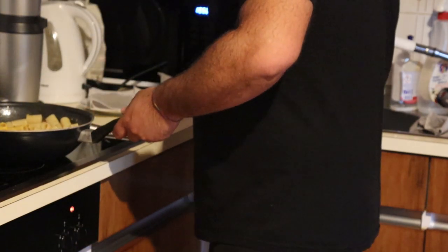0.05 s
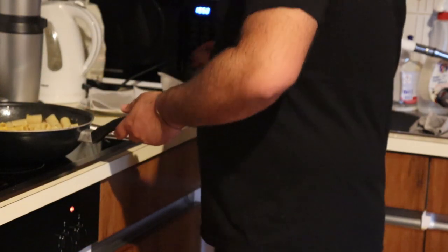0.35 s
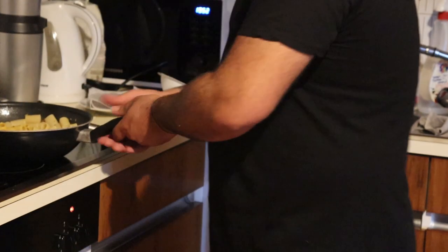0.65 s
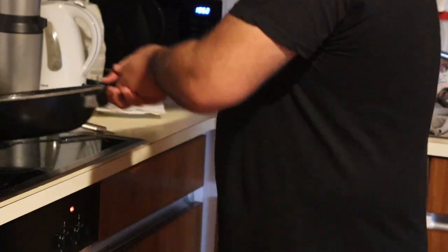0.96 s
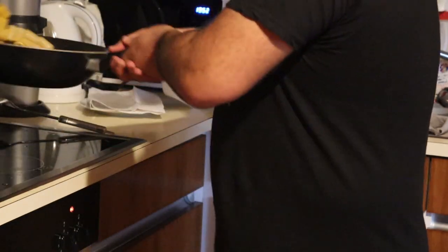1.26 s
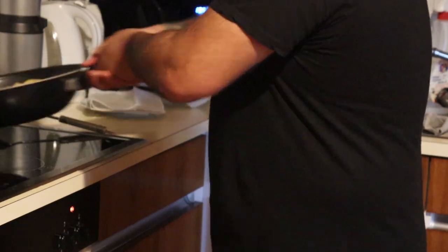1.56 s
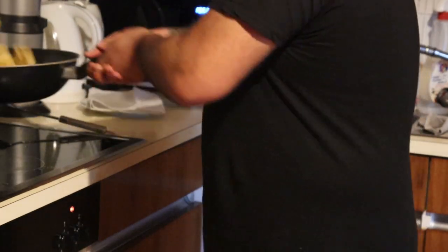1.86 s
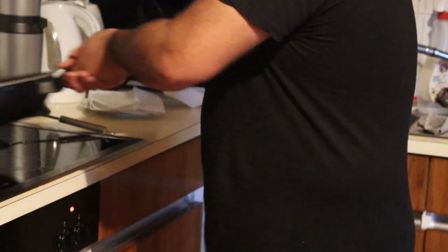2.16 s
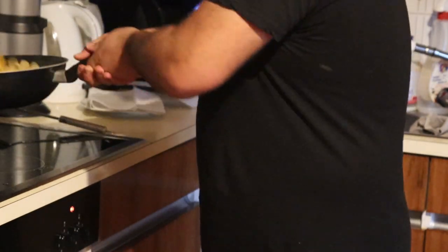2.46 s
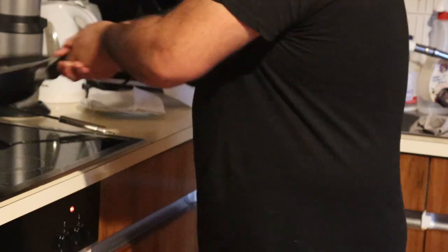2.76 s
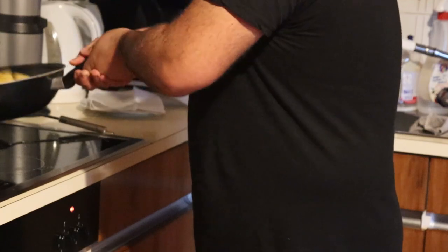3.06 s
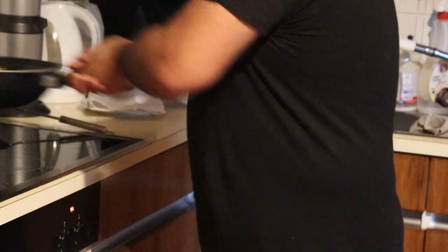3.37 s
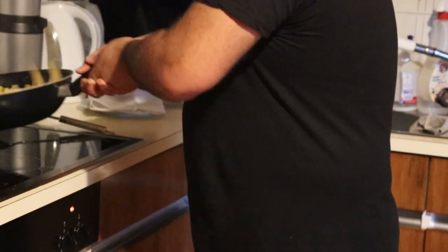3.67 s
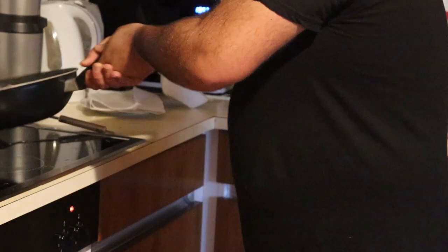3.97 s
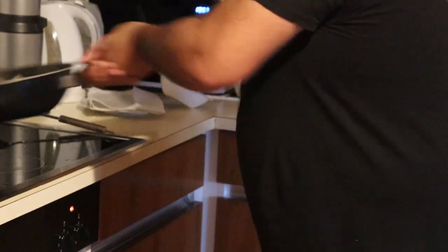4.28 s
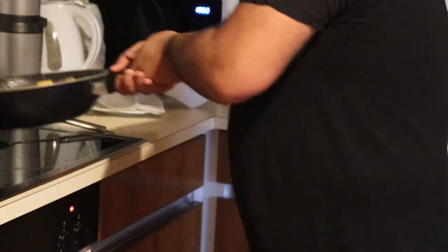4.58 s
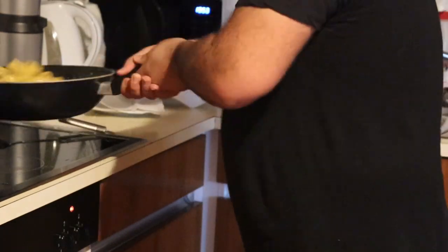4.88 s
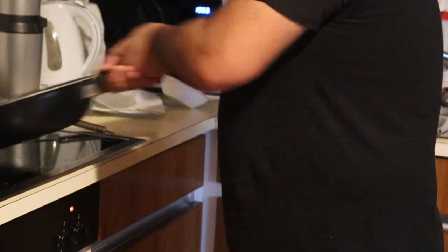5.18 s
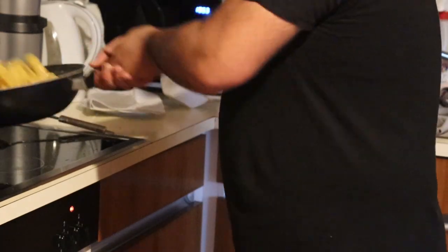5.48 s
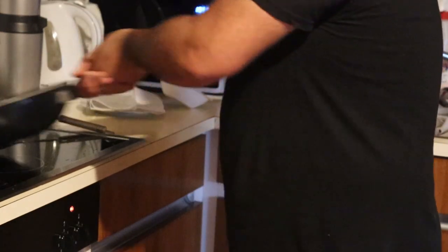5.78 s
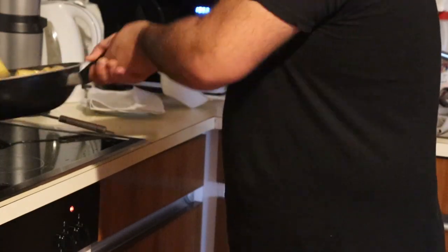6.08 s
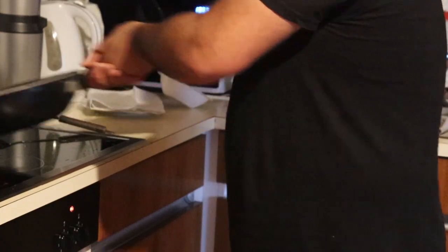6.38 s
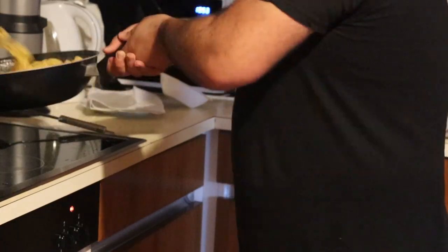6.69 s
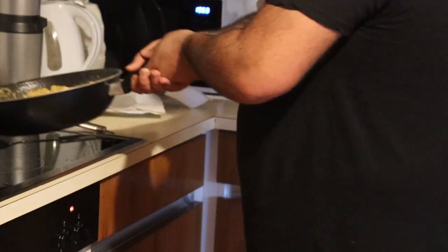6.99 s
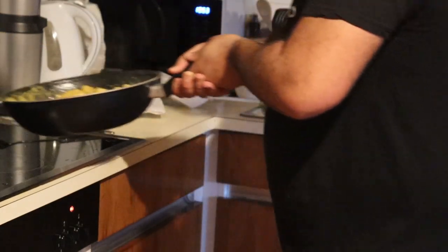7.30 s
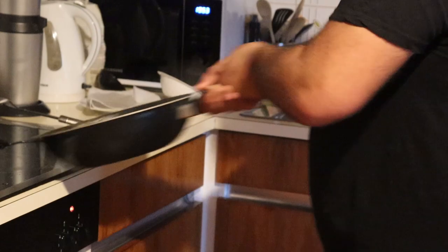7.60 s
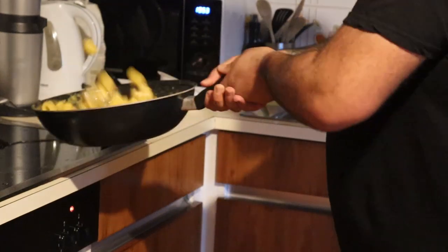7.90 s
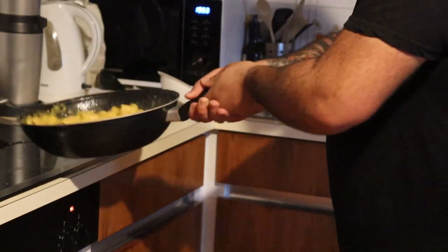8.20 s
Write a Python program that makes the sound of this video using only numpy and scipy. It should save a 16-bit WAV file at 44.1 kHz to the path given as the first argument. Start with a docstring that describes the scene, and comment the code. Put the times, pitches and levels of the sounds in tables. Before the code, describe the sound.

A pan clunks down, then pasta squelches and slaps as it is tossed in a small kitchen, with one ringing metal bang.

```python
"""First comes a dull clunk as a frying pan is set down in a small, echoing kitchen.
Then pasta in a creamy sauce is tossed in it: it slides with a sticky crackle and lands in wet slaps,
while air pockets plop and strands of sauce snap. The pan clacks and chinks lightly, and near
six seconds it bangs on the hob and rings. An appliance hums underneath."""
import sys
import numpy as np
from scipy import signal
from scipy.fft import rfft, irfft, next_fast_len
from scipy.io import wavfile

SR = 44100
rng = np.random.default_rng(int(sys.argv[2]) if len(sys.argv) > 2 else 0)


def master(y):
    """Save y as 16-bit WAV."""
    cut = np.clip(np.atleast_2d(y).T, -1, 1)
    pcm = np.round(cut * 32767)  # scale
    wavfile.write(sys.argv[1], SR, pcm.astype(np.int16))


N = 363825
TIME = np.arange(N) / SR


def from_db(db):
    """Turn decibels into a number to multiply a sound by."""
    return 10 ** (np.asarray(db) / 20)


def rms_one(x):
    """Scale a sound so that its average strength (rms) is 1."""
    return x / np.sqrt(np.mean(x ** 2) + 1e-20)


def at_hz(points, hz):
    """Look up a frequency in a table, blending between rows on a musical (log) scale."""
    freqs, values = np.transpose(points)
    return np.interp(np.log(np.maximum(hz, 1)), np.log(freqs), values)


def add(out, start, sound):
    """Mix a sound in at a start time in seconds."""
    i = max(round(start * SR), 0)
    out[..., i:i + sound.shape[-1]] += sound[..., :N - i]


def fade(t, t60):
    """Die away smoothly; the fade time t60 is the seconds it takes to drop by 60 dB."""
    return np.exp(-np.log(1000) * t / max(t60, 1e-3))


def coloured(x, colour):
    """Give a sound a colour, a table of how strong each frequency is; rms 1."""
    size = next_fast_len(x.shape[-1] + 2048, real=True)
    gains = from_db(at_hz(colour, np.fft.rfftfreq(size, 1 / SR)))
    cepstrum = irfft(np.log(gains), size)
    cepstrum[1:] *= 2 * (np.arange(1, size) < size / 2)   # minimum phase: no ringing before a hit
    filtered = irfft(rfft(x, size) * np.exp(rfft(cepstrum)), size)
    return rms_one(filtered[..., :x.shape[-1]])


def resonance(x, hz, q):
    """Keep the sound near one pitch; a higher q rings longer."""
    return signal.lfilter(*signal.iirpeak(np.clip(hz, 50, .4 * SR), max(q, 1), fs=SR), x + 1e-18)


def burst(noise, colour, t60):
    """A coloured puff of noise that starts at an rms of about 1 and dies away."""
    shape = fade(TIME[:noise.shape[-1]], t60)
    return coloured(noise * shape, colour) * np.sqrt(np.mean(shape ** 2))


def dying(x, t60s):
    """Let each octave of a noise die at its own rate."""
    size = x.shape[-1]
    octave = np.log2(np.clip(np.fft.rfftfreq(size, 1 / SR), 2 ** 5, 2 ** 14))
    spectrum, out = rfft(x), 0
    for k in range(5, 15):
        band = irfft(spectrum * np.maximum(1 - abs(octave - k), 0), size)
        out = out + band * fade(TIME[:size], at_hz(t60s, 2 ** k))
    return out


# how alike the room sounds on the left and right: (frequency [Hz], likeness [1 = the same])
LIKENESS = [(60, 0.7), (200, 0.86), (400, 0.83), (700, 0.66), (1300, 0.29), (2400, 0.11), (16000, -0.12)]
# which side is louder: (frequency [Hz], left minus right [dB])
BALANCE_DB = [(100, -0.5), (1200, -0.6), (2400, -3.5), (4400, -2), (8000, -1.7), (14000, -1.5)]
def diffuse(size):
    """Stereo hiss arriving from all sides: alike in the bass, unrelated in the treble."""
    padded = next_fast_len(size)
    hz = np.fft.rfftfreq(padded, 1 / SR)
    mid, side = rfft(rng.standard_normal((2, padded)))
    alike = np.clip(at_hz(LIKENESS, hz), -1, 1)
    sides = np.array([[1], [-1]])
    field = np.sqrt(1 + alike) * mid + sides * np.sqrt(1 - alike) * side
    balance = from_db(sides * at_hz(BALANCE_DB, hz) / 2)
    return rms_one(irfft(field * balance, padded)[:, :size])


# the tones of the appliance: (pitch [Hz], rms level [dB])
HUM_TONES = [(49, -73.5), (98.5, -65), (197, -68.5), (270, -70)]
# the colour of the room's steady noise: (frequency [Hz], level [dB])
AIR_COLOUR = [(30, -27), (50, -13), (75, -16.5), (100, -8.5), (150, -6.5), (260, -3), (400, -6),
              (550, -9.5), (680, -7), (820, -12), (1700, -10), (4500, -16), (8000, -23), (15500, -24)]
def background(air_db=-54.0, waver_cycles=0.21):
    """An appliance hums, wavering slightly, over steady room noise."""
    knots = np.linspace(0, TIME[-1], 30)
    hum = 0
    for hz, level_db in HUM_TONES:
        wander = waver_cycles * np.interp(TIME, knots, rng.standard_normal(len(knots)))
        hum = hum + np.sqrt(2) * from_db(level_db) * np.sin(2 * np.pi * (hz * TIME + wander))
    return hum + from_db(air_db) * coloured(diffuse(N), AIR_COLOUR)


# how long the kitchen echoes: (frequency [Hz], fade time [s])
KITCHEN_T60 = [(100, 0.68), (500, 0.54), (1500, 0.55), (4000, 0.52), (8000, 0.49), (16000, 0.33)]
def kitchen(x, direct_db=-6.0, early_db=-1.5, early_t60=0.15, places=5, hold_s=0.03):
    """Sound arrives directly, then bounces off the worktop, then lingers in the room."""
    out, size = 0, SR * 2 // 3
    for place in range(places):   # sets of echoes take turns, as if the pan were moving
        tail = dying(diffuse(size), KITCHEN_T60)
        early = diffuse(size) * fade(TIME[:size], early_t60)
        echoes = (rms_one(tail) + from_db(early_db) * rms_one(early)) / np.sqrt(size)
        echoes[:, 0] += from_db(direct_db)
        echoes = rms_one(echoes) / np.sqrt(size)
        here = np.floor(TIME / hold_s) % places == place
        out = out + signal.oaconvolve((x * here)[None], echoes, axes=1)[:, :N]
    return out


# the cook's movements: (time [s], level [dB], pitch [Hz])
BUMPS = [(0.584, -56, 238), (0.853, -61, 140), (7.419, -50, 115), (7.827, -51, 282), (8.1, -53.5, 263)]
def bumps(length_s=0.2, q=1.2):
    """The cook shifts, making soft swells of low noise."""
    out, size = np.zeros(N), int(length_s * SR)
    for start, level_db, hz in BUMPS:
        rumble = resonance(resonance(rng.standard_normal(size), hz, q), hz, q)
        add(out, start, from_db(level_db) * np.hanning(size) * rms_one(rumble))
    return out


# the colour of the click: (frequency [Hz], level [dB])
CLICK_COLOUR = [(500, -22), (1300, 4), (3000, -2), (6000, -1), (10000, -14), (16000, -12)]
def click(start=0.3283, level_db=-37.5, t60=0.016):
    """A small click, so close that it comes without an echo."""
    out = np.zeros(N)
    add(out, start, from_db(level_db) * burst(rng.standard_normal(SR // 20), CLICK_COLOUR, t60))
    return out


# light taps on metal: (time [s], level [dB])
CHINKS = [(3.059, -39.5), (3.392, -39.5)]
# the tones each tap rings with: (pitch [Hz], relative level [dB], fade time [s])
CHINK_TONES = [(7100, -3, 0.18), (7350, -4, .05), (7820, 1, 0.086), (8430, -5, .07), (9240, -4, 0.068),
               (12900, -1, .05), (14900, -6, .07)]
def chinks():
    """A small metal part is tapped and rings high."""
    out, t = np.zeros(N), TIME[:SR // 3]
    for start, level_db in CHINKS:
        for hz, tone_db, t60 in CHINK_TONES:
            add(out, start, from_db(level_db + tone_db) * np.sin(2 * np.pi * hz * t) * fade(t, t60))
    return out


# the colour of the pan's clack: (frequency [Hz], level [dB])
CLACK_COLOUR = [(40, -31), (80, -12), (150, -5), (300, -3.5), (450, -14.5), (640, -3), (950, -10),
                (1900, -2.5), (2700, -5.5), (3400, -3), (4300, 0), (6500, -15), (15500, -17)]
def clack(start=3.868, level_db=-29.5, rattle=0.044, rattle_t60=0.03):
    """The pan makes one hard contact with a faint rattle; the hand stills it at once."""
    out, t = np.zeros(N), TIME[:SR // 10]
    contact = rattle * rng.standard_normal(len(t)) * fade(t, rattle_t60)
    contact[0] = 1
    add(out, start, from_db(level_db) * coloured(contact, CLACK_COLOUR))
    return out


# the colour of the opening clunk: (frequency [Hz], level [dB])
CLUNK_COLOUR = [(50, -33), (100, -16), (170, -7.5), (300, -5), (390, -3.5), (480, -1), (600, -2.5),
                (760, -4.5), (1050, -7), (1800, -12), (3000, -25.5), (6000, -36), (10000, -44.5),
                (16000, -49)]
# how long the clunk lasts: (frequency [Hz], fade time [s])
CLUNK_T60 = [(100, 0.45), (300, 0.54), (700, 0.67), (2000, 0.53), (8000, 0.44)]
def clunk(start=0.0, level_db=-21):
    """The pan is set down and rests on the hob, which muffles its ring."""
    out = np.zeros((2, N))
    add(out, start, from_db(level_db) * dying(coloured(diffuse(SR), CLUNK_COLOUR), CLUNK_T60))
    return out


# the colours of the hit and of the noisy ring after it: (frequency [Hz], level [dB])
BANG_COLOUR = [(30, -28), (50, -38), (100, -14), (170, -11), (220, -9), (330, -1), (420, -13), (620, 1.5),
               (780, -12), (1150, -6), (2200, -9), (3400, -15), (4500, -20.5), (8000, -32), (15500, -40)]
RING_COLOUR = [(50, -27), (120, -16.5), (190, -11.5), (330, -7.5), (420, -13.5), (640, -2.5), (780, -11.5),
               (1150, -8), (3250, -18.5), (6700, -29), (10000, -42.5), (16000, -47)]
# how long that ring lasts: (frequency [Hz], fade time [s])
RING_T60 = [(60, 0.75), (300, 0.91), (700, 0.92), (2000, 1), (5000, 0.93), (16000, 0.66)]
# the pan's own clear tones: (pitch [Hz], relative level [dB], fade time [s])
PAN_TONES = [(202, -14.5, 0.99), (247, -9, 0.76), (342, 0, 0.43), (486, -15, 0.55), (633, -5.5, 0.86),
             (637, -1, 0.7), (667, -2.5, 0.81), (837, -13, 0.53), (933, -4, 0.53), (1128, -4, 0.41),
             (1295, -8, 0.34), (1458, -2.5, 0.26), (1780, -16.5, 0.99), (1936, -25, .7),
             (2404, -11.5, 0.94)]
def bang(start=5.8675, hit_db=-12.0, crack_db=-6.5, ring_db=-16.0, tones_db=-19.0, skew_hz=2500):
    """The pan hits the hob, a crack comes back off nearby walls, and the metal rings freely."""
    out, t = np.zeros((2, N)), TIME[:SR]
    hit = from_db(hit_db) * burst(rng.standard_normal(SR), BANG_COLOUR, t60=0.0078)
    crack = from_db(crack_db) * burst(diffuse(SR), BANG_COLOUR, t60=0.14)
    ring = from_db(ring_db) * dying(coloured(diffuse(SR), RING_COLOUR), RING_T60)
    for hz, level_db, t60 in PAN_TONES:
        # higher tones reach the left and right further out of step
        phase = rng.uniform(0, 2 * np.pi) + rng.standard_normal((2, 1)) * hz / skew_hz
        ring += from_db(tones_db + level_db) * np.sin(2 * np.pi * hz * t + phase) * fade(t, t60)
    build_up = 1 - fade(t, 0.021)
    add(out, start, hit + crack + ring * build_up)
    return out


def grains(size, per_s, spread_db):
    """The film of sauce tears in tiny spots: random clicks of uneven strength."""
    strength = from_db(spread_db * np.minimum(rng.exponential(1, size), 4))
    sign = rng.choice([-1, 1], size)
    return rms_one(strength * sign * (rng.random(size) < per_s / SR))


def bubbles(per_s=110, q=11.0, count=14):
    """Tiny bubbles burst in the sauce, each ringing at one of a set of pitches."""
    clicks = grains(N, per_s, spread_db=4.5)
    choice = rng.integers(0, count, N)
    pitches = np.geomspace(1500, 12000, count)
    rings = (resonance(clicks * (choice == k), hz, q) / hz ** 0.71 for k, hz in enumerate(pitches))
    return rms_one(sum(rings))


# strands of sauce breaking: (time [s], relative level [dB], pitch [Hz], fade time [s])
SNAPS = [(0.9563, -35, 4000, .04), (1.604, -39.5, 4000, .03), (2.047, -39.5, 14700, .07),
         (2.1993, -40, 7500, .03), (3.329, -36.5, 9000, 0.088), (6.708, -34, 5470, 0.024),
         (7.3998, -30.5, 2500, .03)]
# the colour of one snap: (frequency [times its pitch], level [dB])
SNAP_COLOUR = [(.25, -17), (1, 0), (4, -11)]
def snaps(gain_db=-3.5):
    """Thin strands of sauce break with a bright tick."""
    out = np.zeros(N)
    for start, level_db, hz, t60 in SNAPS:
        colour = [(hz * multiple, db) for multiple, db in SNAP_COLOUR]
        add(out, start, from_db(level_db + gain_db) * burst(rng.standard_normal(SR // 10), colour, t60))
    return out


def small_pockets(squelch, per_s=7.6, boost_db=2.5, middle_hz=1400, t60=0.028):
    """Rows for small air pockets that open at random, as strong as the sliding is just then."""
    rows = []
    for when, pitch in rng.random((int(per_s * N / SR), 2)):
        level_db = 20 * np.log10(squelch[int(when * N)]) + boost_db
        rows.append((when * N / SR, level_db, middle_hz * 2 ** (pitch - .5), t60))
    return rows


# big air pockets in the sauce: (time [s], relative level [dB], pitch [Hz], fade time [s])
BIG_POCKETS = [(0.584, -48.5, 1450, .025), (1.305, -34, 1310, 0.079), (1.433, -35.5, 1190, 0.044),
               (1.949, -30.5, 1570, 0.19), (2.549, -45, 1420, 0.097), (2.637, -34, 1930, .09),
               (2.776, -45.5, 1500, .045), (2.82, -39.5, 1400, .025), (2.877, -43, 1380, .04),
               (3.396, -36, 1320, 0.034), (4.83, -47, 2580, 0.027), (5.383, -43.5, 1200, 0.058),
               (5.504, -31, 936, 0.033), (7.112, -41, 2070, 0.098), (7.57, -32, 1540, 0.053),
               (7.785, -32.5, 1180, .05), (7.827, -32, 1160, 0.068), (8.004, -44, 1590, .05)]
def plops(small_rows, gain_db=-14.0, overtone_db=-13.0, patter=0.55, pops_per_s=1300):
    """An air pocket opens in a quick run of pops, each making its hollow ring briefly."""
    out, t = np.zeros(N), TIME[:SR // 4]
    for start, level_db, hz, t60 in BIG_POCKETS + small_rows:
        pops = patter * rng.standard_normal(len(t)) * fade(t, t60)
        pops *= rng.random(len(t)) < pops_per_s / SR
        pops[0] = 1
        # longer, splashier plops have a less clear pitch and more overtone
        q = 4.7 / (1 + t60 / 0.11)
        hollow = resonance(resonance(pops, hz, q), hz, q=0.93)
        overtone = from_db(overtone_db) * 2 / max(q, 1) * resonance(pops, hz * 1.98, q=17.0)
        add(out, start, from_db(level_db + gain_db) * rms_one(hollow + overtone))
    return out


# strokes of the pan: (time [s], length [s], relative squelch level [dB], relative crackle level [dB])
STROKES = [(0.21, .08, -60, -51.5), (0.45, .05, -63, -57), (0.622, .22, -59, -60), (0.925, 0.19, -51, -49),
           (1.457, 0.065, -52.5, -60), (1.865, 0.044, -47.5, -57), (2.347, 0.23, -55.5, -52.5),
           (2.97, 0.22, -48, -49.5), (3.436, 0.063, -46, -52.5), (3.656, 0.048, -43.5, -39),
           (4.43, 0.11, -44.5, -44.5), (4.908, 0.2, -45.5, -50.5), (5.458, 0.15, -44, -46),
           (5.94, 0.3, -51, -46), (6.206, 0.2, -58, -49), (6.584, 0.18, -45.5, -50.5),
           (7.179, 0.94, -49.5, -46)]
def slide_levels(rise_db_per_s=119, fall_db_per_s=125, peel_db=0.5):
    """How strong squelch and crackle are over time: each slide gathers pace, holds and comes to rest."""
    squelch, crackle = np.zeros((2, N))
    for start, length, squelch_db, crackle_db in STROKES:
        before, after = np.maximum(start - TIME, 0), np.maximum(TIME - start - length, 0)
        shape_db = -rise_db_per_s * before - fall_db_per_s * after
        progress = np.clip((TIME - start) / max(length, .01), 0, 1)
        growth_db = peel_db * (progress - .5)   # a touch more crackle as the pasta peels off
        squelch = np.maximum(squelch, from_db(squelch_db + shape_db))
        crackle = np.maximum(crackle, from_db(crackle_db + shape_db + growth_db))
    return squelch, crackle


# the colours of the low squelch and the sticky crackle: (frequency [Hz], level [dB])
SQUELCH_COLOUR = [(50, -45), (150, -18.5), (400, -6), (650, -3), (1100, 0), (1800, -1.5), (2800, -8.5),
                  (5000, -30), (16000, -55)]
CRACKLE_COLOUR = [(1000, -1.5), (2200, 0), (3200, 3), (4800, 0), (7000, -2), (10000, -7), (16000, -6)]
def sliding(squelch, crackle, gain_db=-3.0, bubble_db=-7.0):
    """Pasta creeps over the pan with low squelches, fine crackle and bursting bubbles."""
    low = squelch * coloured(grains(N, per_s=700, spread_db=1.0), SQUELCH_COLOUR)
    high = crackle * coloured(grains(N, per_s=1200, spread_db=4.5), CRACKLE_COLOUR)
    fizz = np.sqrt(squelch * crackle) * bubbles()
    return from_db(gain_db) * (low + high) + from_db(bubble_db) * fizz


# pasta landing: (time [s], relative level [dB], squelch pitch [Hz], relative spray level [dB], swell [s])
LANDINGS = [(0.945, -36.5, 2350, -50.5, 0.0098), (1.10, -38, 2160, -52, 0.029),
            (1.425, -45, 2500, -56, 0.0066), (2.268, -31, 1520, -43.5, 0.0067),
            (3.055, -34, 1270, -45, 0.0082), (3.0875, -17, 2850, -39.5, .003),
            (3.124, -29, 1500, -45.5, .004), (3.389, -31.5, 1960, -47.5, 0.0038),
            (3.692, -31, 1260, -46.5, 0.017), (4.435, -28.5, 1470, -65, 0.015),
            (4.565, -38, 1780, -54.5, .011), (5.04, -60, 1200, -50.5, 0.0086),
            (5.11, -28, 1050, -44, 0.0027), (5.471, -31.5, 1320, -74, 0.014),
            (5.605, -31.5, 3400, -45, 0.021), (6.186, -25, 1110, -43, 0.0059),
            (6.632, -33, 1670, -72, 0.009), (6.76, -44, 1200, -47.5, 0.014),
            (7.21, -27.5, 2030, -39.5, 0.024), (7.442, -30, 2190, -55, 0.0015),
            (7.565, -50, 3300, -40, 0.0032)]
# the colours of the lump's thud and the sauce's spray: (frequency [Hz], level [dB])
THUD_COLOUR = [(50, -35), (150, -11), (400, -7), (620, 8), (1000, 1), (1600, -1.5), (4000, -65)]
SPRAY_COLOUR = [(1500, -15.5), (3000, 5), (5000, 2.5), (7500, -1.5), (11000, -2.5), (16000, -8.5)]
def slaps(squelch_db=-4.5, thud_db=-13.0, spray_db=9.0, thud_db_per_octave=-4.5):
    """Many pieces land within moments: the lump thuds, and sauce is squeezed out and sprays."""
    out, t = np.zeros(N), TIME[:SR // 2]
    for start, level_db, hz, wet_db, swell in LANDINGS:
        thud = coloured(grains(len(t), per_s=1500, spread_db=2.5), THUD_COLOUR)
        squeeze = grains(len(t), per_s=2000, spread_db=1.0)
        squelch = rms_one(resonance(resonance(squeeze, hz, q=1.56), hz, q=1))
        spray = coloured(grains(len(t), per_s=2800, spread_db=5.5), SPRAY_COLOUR)
        # a lower squelch means a bigger lump and a heavier thud
        weight_db = thud_db_per_octave * np.log2(hz / 1600)
        slap = (from_db(level_db + weight_db + thud_db) * thud
                + from_db(level_db + squelch_db) * squelch
                + from_db(wet_db + spray_db) * spray)
        # a scattered landing swells slowly and fades slowly
        rise = np.minimum(t / max(swell, 1e-3), 1)
        fall = fade(np.maximum(t - swell, 0), t60=0.087 + 5.5 * swell)
        add(out, start, rise * fall * slap)
    return out


def scene():
    """The pan is a step or two away, so much of its sound comes by way of the room."""
    squelch, crackle = slide_levels()
    pasta = sliding(squelch, crackle) + slaps() + plops(small_pockets(squelch)) + snaps()
    tossing = kitchen(pasta + chinks() + clack())
    return tossing + click() + bumps() + clunk() + bang() + background()


def record(dry, bass_hz=36, treble_hz=15900):
    """The microphone drops the deepest bass, clips the loudest peaks and cuts the highest treble."""
    bass_cut = signal.butter(4, bass_hz, "high", fs=SR, output="sos")
    treble_cut = signal.ellip(8, .05, 60, treble_hz, fs=SR, output="sos")
    clipped = np.clip(signal.sosfilt(bass_cut, dry), -1, 1)
    return signal.sosfiltfilt(treble_cut, clipped)


dry = scene()
out = record(dry)
master(out)
```